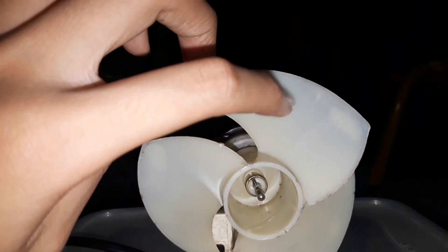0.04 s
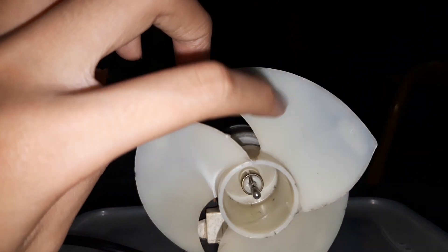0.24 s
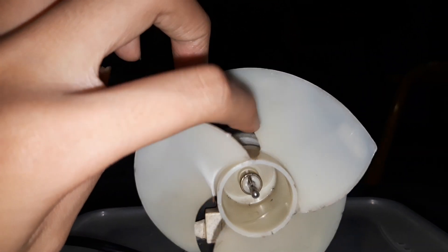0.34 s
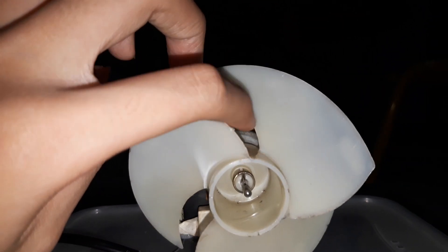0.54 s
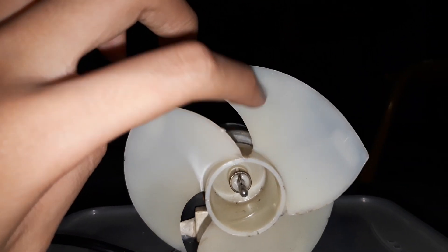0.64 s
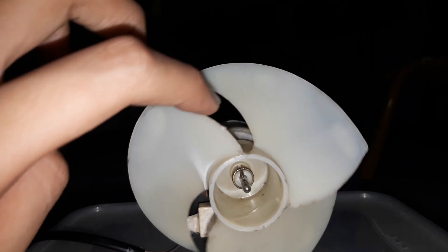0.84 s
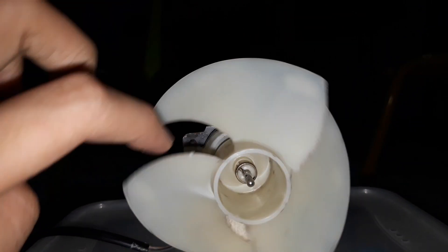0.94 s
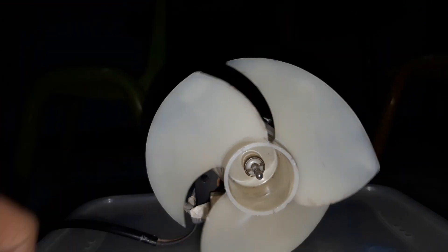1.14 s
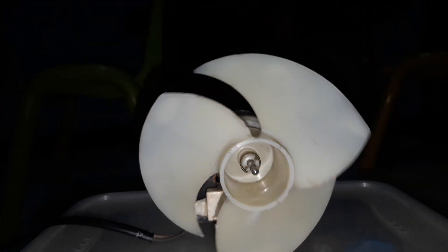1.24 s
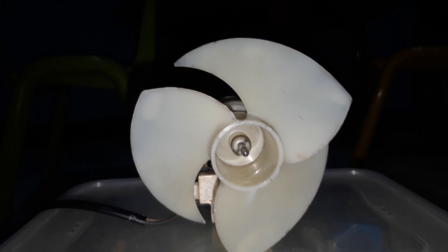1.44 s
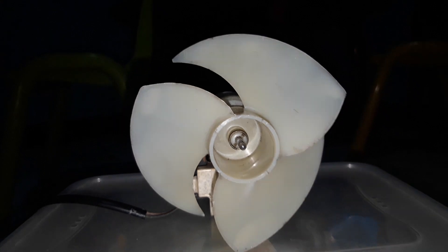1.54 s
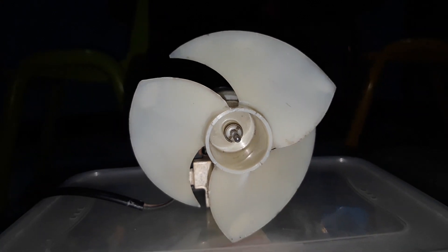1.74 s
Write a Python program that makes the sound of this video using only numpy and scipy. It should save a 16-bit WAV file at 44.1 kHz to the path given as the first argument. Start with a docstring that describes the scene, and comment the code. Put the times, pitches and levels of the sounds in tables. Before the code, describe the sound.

Fingernail taps click sharply on a plastic fan blade, then the loose rotor knocks.

```python
"""A hard-walled room with a low hum and faint hiss, the microphone close to a plastic fan.
A fingernail taps one blade three times, moving towards the rim; the second tap strikes twice.
Each tap is a crack of the nail, a soft fingertip thump and a brief ring of the blade.
The finger then pushes the blade round with a short scrape, and the loose rotor knocks on its shaft.
The room rings after each click, and at the start still rings from an earlier tap."""
import sys
import numpy as np
from scipy import signal
from scipy.fft import rfft, irfft
from scipy.io import wavfile

SR = 44100
rng = np.random.default_rng(int(sys.argv[2]) if len(sys.argv) > 2 else 0)


def wav_out(sig):
    """Save sig, one row per channel (or a flat mono array), as 16-bit PCM at SR to the path in sys.argv[1]."""
    wavfile.write(sys.argv[1], SR, np.round(np.clip(np.atleast_2d(sig).T, -1, 1) * 32767).astype(np.int16))


N = 79380


def undb(db):
    """Decibels to gain."""
    return 10 ** (np.asarray(db) / 20)


def fade(t, t60):
    """Exponential decay from t = 0, down 60 dB after t60 seconds."""
    return (t >= 0) * np.exp(-np.log(1000) * np.maximum(t, 0) / t60)


def per_bin(hz, values):
    """A curve spread over the FFT bins along a log-frequency axis."""
    bin_hz = np.fft.rfftfreq(N, 1 / SR)
    return np.interp(np.log(np.maximum(bin_hz, 1)), np.log(hz), values)


def noise(colour):
    """Noise of rms 1 with the given colour (f/Hz, level/dB)."""
    hz, db = np.array(colour).T
    coloured = irfft(rfft(rng.standard_normal(N)) * undb(per_bin(hz, db)), N)
    return coloured / coloured.std()


def burst(t, colour, t60):
    """A dying burst of dense micro-impacts, rung through a smooth colour (f/Hz, level/dB)."""
    hz, db = np.array(colour).T
    samples = np.arange(N)
    age = samples / SR
    envelope = fade(age, t60)
    spectrum = rfft(rng.standard_normal(N) * envelope)
    impacts = irfft(spectrum / np.abs(spectrum), N) * (age < t60)
    # minimum phase: the colour rings only after each impact
    cepstrum = irfft(np.log(undb(per_bin(hz, db))), N)
    resonance = np.exp(rfft(2 * cepstrum * (samples > 0) * (samples < N // 2)))
    rung = irfft(rfft(impacts) * resonance, N)
    placed = np.interp(np.round(t * SR), samples, rung, left=0)
    return placed * np.sqrt(np.sum(envelope ** 2) / np.sum(placed ** 2))


# colour of the room tone at the microphone: f/Hz, relative level/dB
ROOM_TONE = [(20, -35.5), (35, -31), (46, -8.5), (65, -35.5), (82, -6), (105, 5), (135, 0), (200, -2.5),
             (300, -9.5), (370, -17.5), (650, -11.5), (1000, -18), (1200, -10), (1450, -12.5),
             (1900, -31.5), (2600, -24.5), (3300, -31.5), (6000, -37), (8400, -25), (11000, -44.5),
             (16000, -42)]
# low rumble, higher while the hand is on the fan: t/s, gain/dB
RUMBLE_GAIN = [(0, 4), (.2, 3), (.35, -0.5), (.7, 0), (.85, 3), (.96, -1), (1.8, -4.5)]
ROOM_TONE_DB, RUMBLE_HZ, RUMBLE_WANDER_DB = -53, 280, 1


def room_tone(t):
    """Hum and hiss all round; the low rumble wavers and eases once the hand lets go."""
    air = undb(ROOM_TONE_DB) * noise(ROOM_TONE)
    rumble = signal.sosfiltfilt(signal.butter(2, RUMBLE_HZ, fs=SR, output="sos"), air)
    hiss = air - rumble
    wander_db = RUMBLE_WANDER_DB * noise([(1, 48), (8, 8), (25, -95), (100, -83)])
    hand_db = np.interp(t, *np.array(RUMBLE_GAIN).T)
    return hiss + rumble * undb(wander_db + hand_db)


# reverberation off the hard walls: f/Hz, level/dB, t60/s
WALL_BANDS = [(100, -11, 0.78), (400, -5, .55), (1110, -5, .6), (1750, -8, .6), (2260, 4.5, 0.56),
              (2800, -7, .68), (4380, -11.5, 0.68), (5460, -11.5, .7), (6400, -13, 0.64), (9500, -12, 0.57),
              (14080, -7.5, 0.3)]
TAIL_BUILD_S, EARLY_DB, EARLY_T60_S = 0.021, -14, 0.1
RING_TO_WALLS_DB, TICK_TO_WALLS_DB = -4.5, 9  # relative to what reaches the microphone directly


def room_echo(sound, t):
    """Quick reflections from nearby things, then a diffuse tail that builds up and dies band by band."""
    hz, db, t60s = np.array(WALL_BANDS).T
    spectrum = rfft(rng.standard_normal(N)) * undb(per_bin(hz, db))
    build_up = 1 - np.exp(-(t / TAIL_BUILD_S) ** 2)
    tail = 0
    for share, t60 in zip(np.eye(len(hz)), t60s):
        band = irfft(spectrum * per_bin(hz, share), N)
        envelope = fade(t, t60) * build_up
        tail += band * envelope / np.linalg.norm(envelope)
    early = rng.standard_normal(N) * fade(t - .002, EARLY_T60_S)
    early *= undb(EARLY_DB) / np.linalg.norm(early)
    return signal.fftconvolve(sound, tail + early)[:N]


def earlier_tap_echo(t, at=-0.028, strength_db=-0.64):
    """The walls still ring from a tap just before the start."""
    ring = undb(RING_TO_WALLS_DB) * blade_ring(t, spot=0, contact_ms=0.15)
    crack = undb(-15) * nail_crack(t, spot=0, t60=0.0033)
    echo = room_echo(ring + crack, t)
    return undb(strength_db) * np.interp(t - at, t, echo, right=0)


# scrapes of finger and hub, close up: middle t/s, half length/s, level/dB
SCRAPE_EVENTS = [(0.9367, 0.0099, -46), (1.535, .035, -63)]
# colour of rubbed plastic: f/Hz, relative level/dB
SCRAPE_COLOUR = [(300, 7), (1200, -17), (1750, 3.5), (2400, -19), (3400, -9), (4200, -0.5), (5400, -12),
                 (7200, -7), (10000, -8), (12000, -27), (16000, -31)]


def scrapes(t, graininess=.3):
    """Short rubs on the plastic: swells of friction noise with a grainy level."""
    grain = np.exp(graininess * noise([(20, -2), (600, 8.5), (2000, -48)]))
    grain /= np.sqrt(np.mean(grain ** 2))
    swells = sum(undb(db) * np.exp(-((t - at) / half) ** 2) for at, half, db in SCRAPE_EVENTS)
    return swells * grain * noise(SCRAPE_COLOUR)


# knocks of the rotor, close up: t/s, body level/dB, tick level/dB
ROTOR_KNOCKS = [(.4475, -39, -58), (0.4755, -40, -58), (.9255, -41, -47.5), (1.2574, -33, -33)]
# colours of a knock's body and tick: f/Hz, relative level/dB
BODY_COLOUR = [(80, -24.5), (240, -1), (330, -4), (440, 8), (620, -1), (900, 3.5), (1350, 1), (1600, -3.5),
               (1900, -8.5), (2600, -36.5), (8000, -56)]
TICK_COLOUR = [(500, -27.5), (2400, -26), (3200, -2.5), (3900, -5), (4700, 0.5), (6200, -2), (7200, 0.5),
               (9100, 1), (12000, -28), (16000, -23.5)]


def rotor_knocks(t):
    """The loose hub meets the shaft with a dull body and a bright tick."""
    body = sum(undb(db) * burst(t - at, BODY_COLOUR, t60=0.025) for at, db, _ in ROTOR_KNOCKS)
    tick = sum(undb(db) * burst(t - at, TICK_COLOUR, t60=0.013) for at, _, db in ROTOR_KNOCKS)
    return body, tick


# colour of the fingertip's thump: f/Hz, relative level/dB
THUMP_COLOUR = [(50, -44), (110, -11.5), (170, 6), (260, 3), (370, -2.5), (520, -21.5), (2000, -40)]


def fingertip_thump(t, lag_s=0.0024):
    """The soft fingertip lands just after the nail."""
    return burst(t - lag_s, THUMP_COLOUR, t60=0.12)


# modes of the plastic blade: f/Hz, t60/s, level/dB struck at spot 0, 1, 2 (towards the rim)
BLADE_MODES = [(650, 0.061, -43.5, -54, -51), (1144, 0.085, -36.5, -34, -37), (1429, .05, -36, -41, -45),
               (1764, 0.052, -56.5, -26.5, -28), (2287, 0.14, -51, -40, -45.5),
               (2890, 0.034, -33.5, -30.5, -34.5), (3550, 0.048, -33, -35.5, -37),
               (4090, 0.016, -19, -11, -11), (4636, 0.019, -16.5, -15, -15.5),
               (5920, 0.017, -26, -41, -32.5), (6370, 0.013, -29, -12, -14), (7720, .02, -23, -36, -33),
               (8310, .016, -28.5, -33.5, -36), (9170, .024, -28, -34, -42), (9400, .012, -27, -37, -18.5)]


def blade_ring(t, spot, contact_ms):
    """The blade's modes swell while the nail is in contact, then die; the spot sets their balance."""
    swell = 1 - np.exp(-np.maximum(t, 0) * 1000 / contact_ms)
    modes = 0
    for k, (hz, t60, *spot_db) in enumerate(BLADE_MODES):
        modes += (-1) ** k * undb(spot_db[spot]) * fade(t, t60) * np.sin(2 * np.pi * hz * t)
    return swell * modes


# colour of the nail's crack: f/Hz, relative level/dB at spot 0, 1, 2
CRACK_COLOUR = [(60, -51, -29, -48.5), (250, -21.5, -17.5, -14), (850, -25, -22, -24),
                (1512, -14, -12.5, -17.5), (1964, -37.5, -12.5, -6), (2450, -33.5, -25, -22.5),
                (2910, -8.5, -5.5, -11.5), (3700, -7, -6.5, -13), (4510, -5, 2, -2.5),
                (5395, -10.5, -9, -16), (5740, 1.5, -2.5, -2), (7300, -14, -9, -11), (9200, -7.5, -7, -4),
                (10780, -16, -19, -13), (12000, -28.5, -32, -27.5), (16000, -34, -33, -27)]


def nail_crack(t, spot, t60):
    """The hard nail hits the plastic: a bright burst coloured by the spot."""
    return burst(t, np.array(CRACK_COLOUR)[:, [0, 1 + spot]], t60)


# taps close to the microphone:
# t/s, spot, strength/dB, contact time/ms, relative crack level/dB, crack t60/s, relative thump level/dB
NAIL_TAPS = [(0.2, 0, 0, 0.13, -13.5, 0.007, -45), (0.3962, 1, -2, .25, -11, .011, -45.5),
             (0.4232, 1, -13.5, 0.79, -13, .014, -33), (0.5894, 2, 0, .6, -15.5, 0.015, -38.5)]


def nail_taps(t):
    """Each tap makes a contact sound, crack plus thump, and sets the blade ringing."""
    contact, ring = 0, 0
    for at, spot, strength_db, contact_ms, crack_db, crack_t60, thump_db in NAIL_TAPS:
        age = t - at
        thump = undb(thump_db) * fingertip_thump(age)
        crack = undb(crack_db) * nail_crack(age, spot, crack_t60)
        contact += undb(strength_db) * (crack + thump)
        ring += undb(strength_db) * blade_ring(age, spot, contact_ms)
    return contact, ring


def scene():
    """One microphone close to the fan, with the walls' echo and the room tone behind."""
    t = np.arange(N) / SR
    contact, ring = nail_taps(t)
    body, tick = rotor_knocks(t)
    handling = contact + body + scrapes(t)
    direct = handling + ring + tick
    to_walls = handling + undb(RING_TO_WALLS_DB) * ring + undb(TICK_TO_WALLS_DB) * tick
    return (direct + room_echo(to_walls, t) + earlier_tap_echo(t) + room_tone(t))[None]


TREBLE_CUT_HZ = 15900


def record(dry):
    """The recorder cuts the highest treble steeply."""
    return signal.sosfilt(signal.ellip(8, .2, 70, TREBLE_CUT_HZ, fs=SR, output="sos"), dry)


dry = scene()
out = record(dry)
wav_out(out)
```